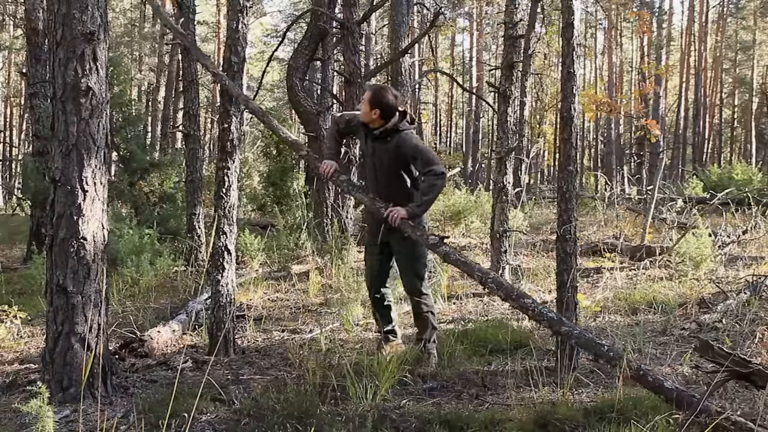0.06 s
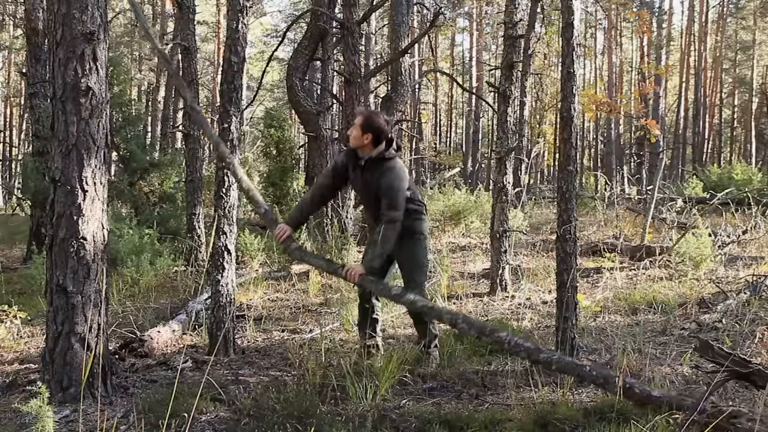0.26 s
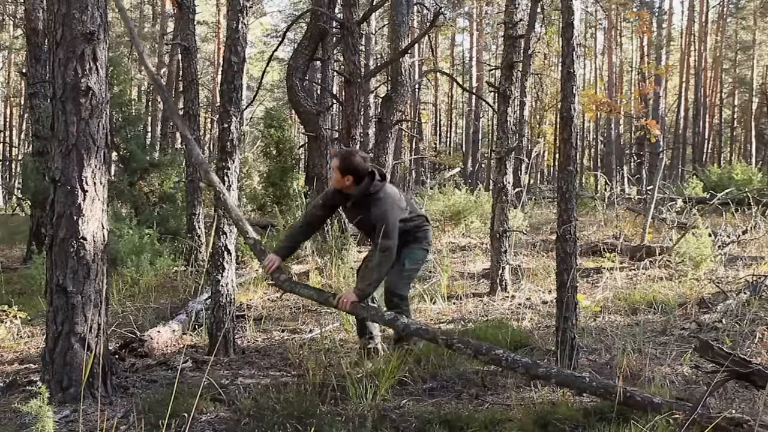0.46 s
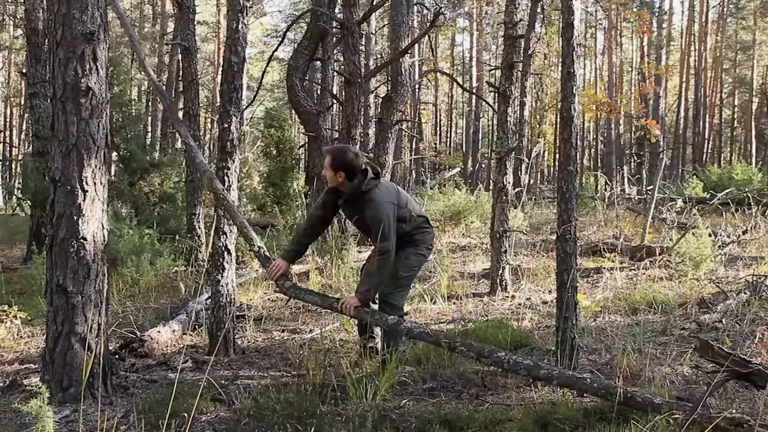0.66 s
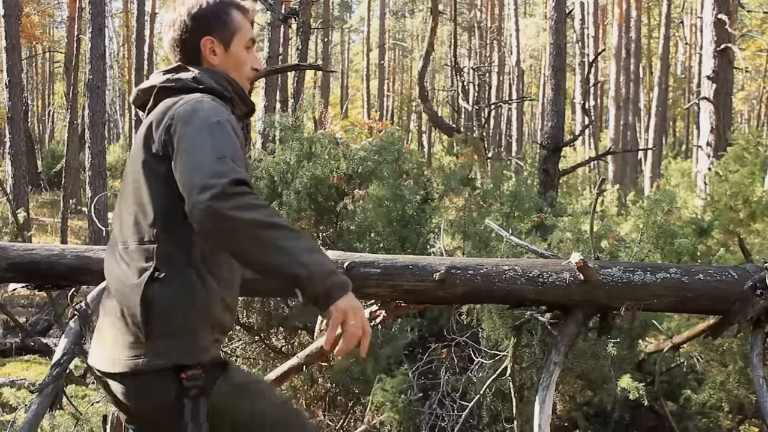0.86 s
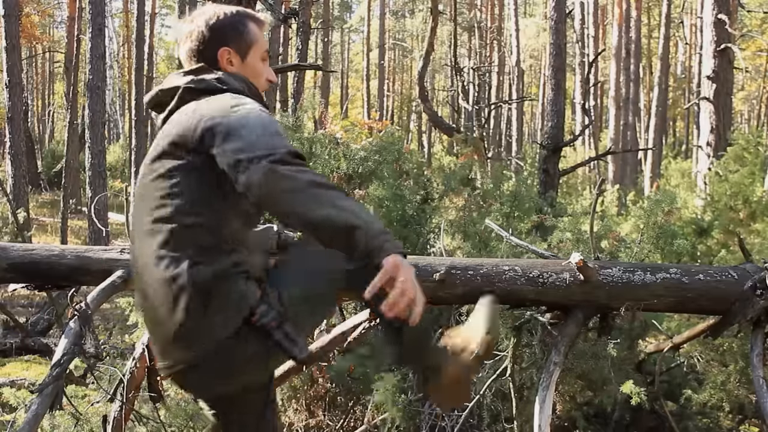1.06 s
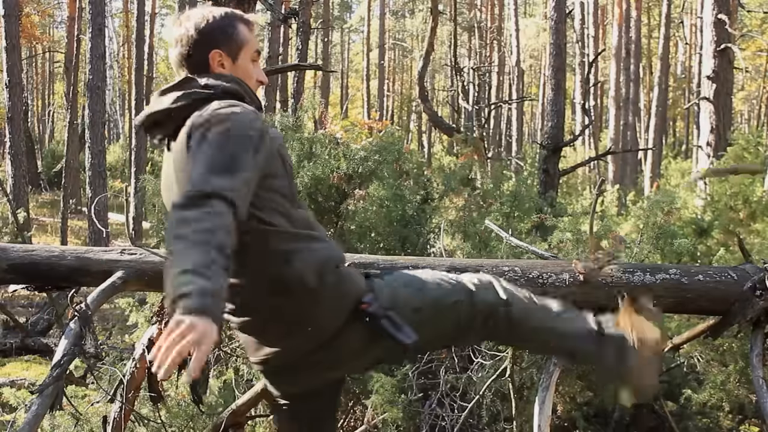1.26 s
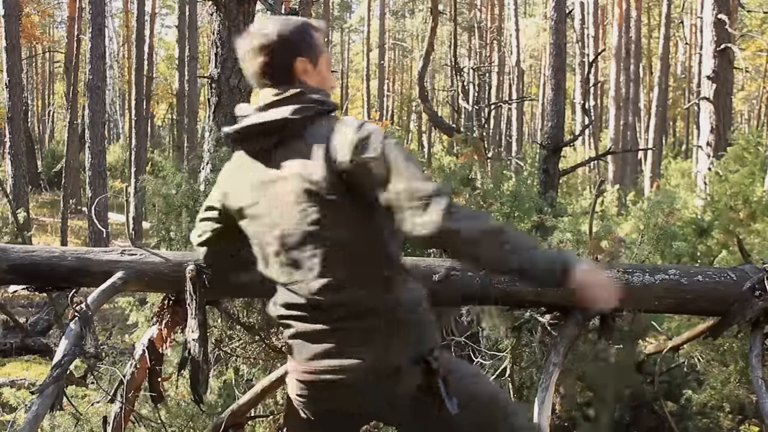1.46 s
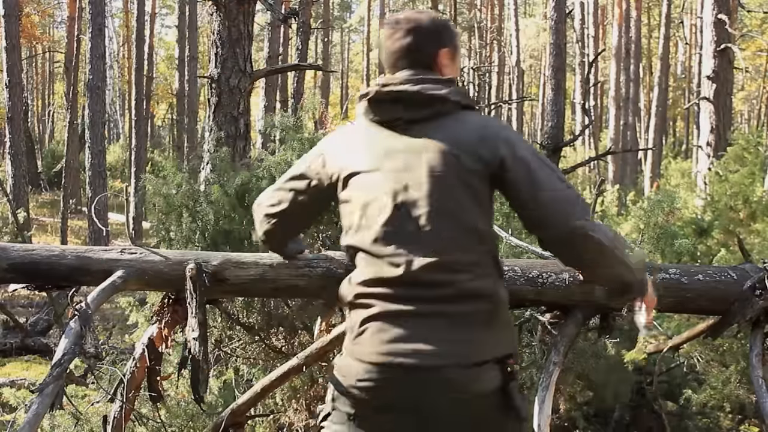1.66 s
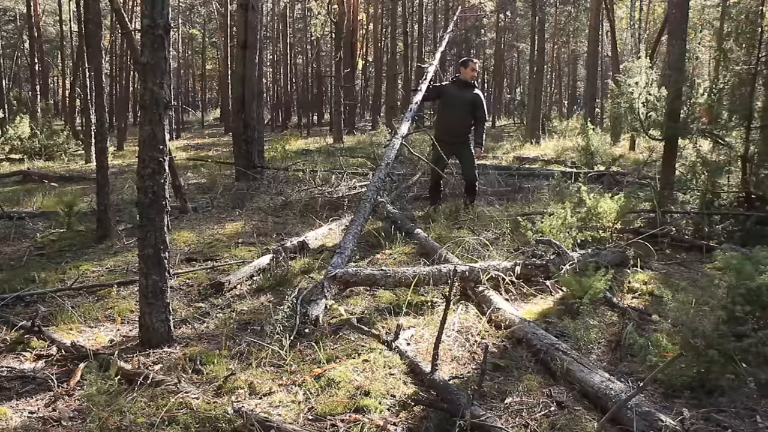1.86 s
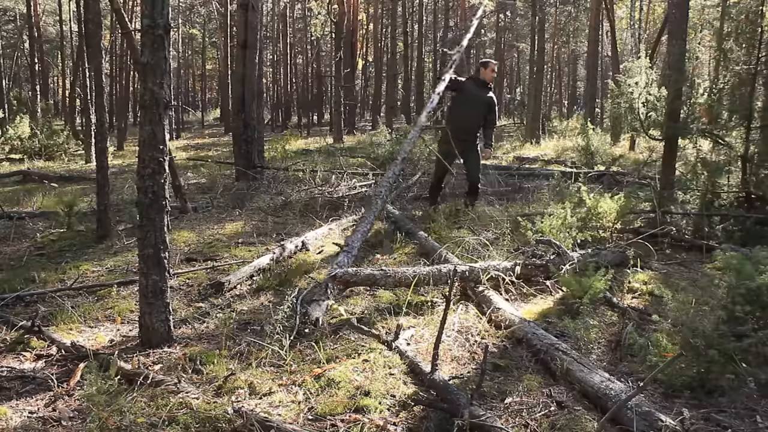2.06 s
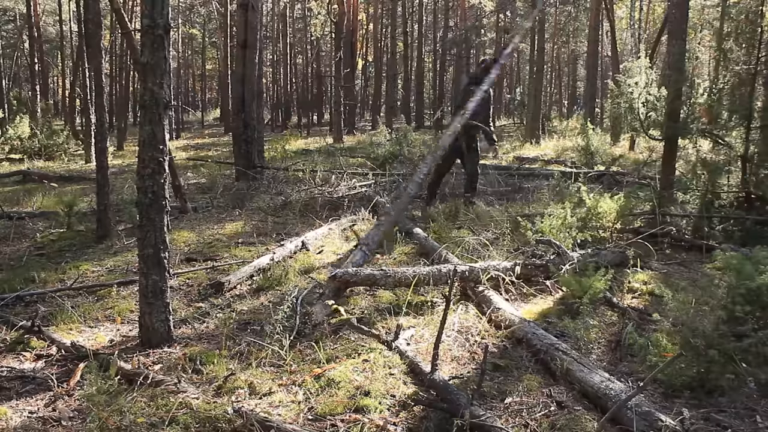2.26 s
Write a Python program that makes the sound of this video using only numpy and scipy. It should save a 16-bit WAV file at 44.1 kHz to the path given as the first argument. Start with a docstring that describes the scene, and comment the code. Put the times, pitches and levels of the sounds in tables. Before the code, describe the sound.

Dead wood cracks: a long pole splinters in a quick run of snaps and drops to the ground. Closer, two kicks snap dry branches, one scrapes through a bush, then a distant knock echoes in the quiet forest.

```python
"""A long dead pole is bent against a trunk in a quiet pine forest: fibres snap one by one, it splits
with falling bending-wave chirps and drops to the ground. Nearer, two kicks crack dry branches off a
fallen tree and a loose branch scrapes through a bush; then a far pole knocks on a log. Breaks are
pulses and click bursts that ring the wood's modes. Litter and clothes rustle over tree hiss and a low
rumble; the trunks scatter a long echo."""
import sys
import numpy as np
from scipy import signal
from scipy.fft import rfft, irfft
from scipy.io import wavfile

SR = 44100
rng = np.random.default_rng(int(sys.argv[2]) if len(sys.argv) > 2 else 0)


def log_audio(samples):
    """Write samples as a 16-bit WAV file to the path given in sys.argv[1]."""
    # one column per channel
    frames = np.atleast_2d(samples).T
    # limit to full scale, then quantise
    limited = np.clip(frames, -1, 1)
    pcm = np.round(limited * 32767).astype(np.int16)
    wavfile.write(sys.argv[1], SR, pcm)


N = 101429
T = np.arange(N) / SR

# Spectrum of cracking wood. Each row: frequency in Hz, relative level in dB.
CRACK_SPECTRUM = [(60, -18.5), (160, -12), (300, -6.5), (600, -5), (1200, -2), (2000, -1), (2700, 2.5),
                  (3900, 1), (5000, -6), (8500, -8), (15000, -19)]
# Spectrum of splinters and twigs. Each row: frequency in Hz, relative level in dB.
SPLINTER_SPECTRUM = [(60, -36), (300, -5.5), (1000, 0), (2500, 3.5), (4200, 4), (6500, -1), (9000, -1),
                     (15000, -22.5)]


def pole():
    """The bent pole breaks: snaps, splits and splinters ring its modes."""
    # Each row: start in seconds, level in dB, pitch in Hz.
    snap_rows = [(.2050, -24.5, 3000), (0.2299, -18, 2180), (0.2317, -8.5, 3700), (0.243, -9, 2430),
                 (0.2531, -2.5, 2280), (.2615, -1.5, 3450), (0.2665, -18, 1500), (0.2719, -10, 1570),
                 (0.2823, -6, 2650), (0.2864, -7.5, 1930), (0.2917, -27, 1980), (0.3005, -3.5, 2200),
                 (0.326, -10.5, 2600), (.3440, -17, 1920), (0.3755, -22, 1500), (.4488, -24, 2710)]
    # Each row: start in seconds, level in dB, first pitch in Hz, travel, rise and decay in seconds.
    split_rows = [(.2604, -1, 2508, .017, 0.00072, 0.0038), (0.3055, 1, 2549, .0175, 0.0015, 0.0042),
                  (.3385, -13, 1498, 0.0178, 0.0016, 0.003)]
    # Each row: start in seconds, level in dB, rise and decay in seconds.
    splinter_rows = [(0.2314, -17.5, 0.00024, 0.0018), (0.2604, -22, 0.00088, 0.0027),
                     (0.2869, -30, .001, .007), (0.3079, -6.5, 0.0011, 0.0013),
                     (.3260, -15, 0.00035, 0.0015), (.3315, -39, .0005, .003), (0.3433, -25, .001, 0.0055),
                     (0.356, -24, 0.00039, 0.0038), (0.365, -23.5, 0.00096, 0.0087),
                     (0.3722, -39.5, 0.00046, 0.015), (.4484, -24.5, 0.00056, 0.0013)]
    # Each row: mode frequency in Hz, gain in dB, t60 in seconds.
    pole_modes = [(498, -0.5, .09), (675, -3, 0.037), (872, 2, 0.063), (966, -2.5, 0.05), (1334, -4, 0.099),
                  (1432, -0.5, 0.12), (1660, -22, 0.076), (1817, -0.5, 0.039), (2330, -21, 0.078),
                  (2650, -13, 0.063)]
    snaps = placed((start_s, snap(db, hz)) for start_s, db, hz in snap_rows)
    splits = placed((start_s, split(*row)) for start_s, *row in split_rows)
    splinters = placed((start_s, crackle(*row)) for start_s, *row in splinter_rows)
    return ringing(snaps + splits + coloured(splinters, SPLINTER_SPECTRUM), pole_modes)


def snap(db, hz):
    """One fibre lets go: about two cycles of a wide wood resonance, then grit."""
    q, low_hz, high_hz = 2.46, 990, 4100
    pulse = resonance(signal.unit_impulse(SR // 10), hz, hz / q)
    pulse = butter(butter(pulse, low_hz, "high"), high_hz, "low", order=4)
    grit = crackle(db=-16.5, rise_s=0.0005, decay_s=0.0016)[:len(pulse)]
    return from_db(db) * (pulse / np.abs(pulse).max() + coloured(grit, CRACK_SPECTRUM))


def split(db, first_hz, travel_s, rise_s, decay_s):
    """Bending waves from a ragged tear: speed goes with the root of frequency, so the pitch falls."""
    fade_s, roughness, rough_hz = 0.018, 0.55, 500
    t = T[:SR // 10]
    wave_time_s = t / (1 + t / travel_s)  # loss goes per cycle, so low waves last longest
    phase = 2 * np.pi * first_hz * wave_time_s
    envelope = swell(wave_time_s, rise_s, decay_s) * np.exp(-t / fade_s)
    noise = butter(rng.standard_normal((2, 2 * len(t))), rough_hz, "low")
    rough_sin, rough_cos = roughness * rms_one(noise[:, len(t):])
    chirp = envelope * ((1 + rough_sin) * np.sin(phase) + rough_cos * np.cos(phase))
    return from_db(db) * chirp * np.linalg.norm(envelope) / np.linalg.norm(chirp) / np.sqrt(2)


def branches():
    """Kicked branches: each crack is an avalanche of breaking fibres that rings the wood."""
    # Each row: start in seconds, level in dB, rise and decay in seconds, tilt in dB per octave.
    crack_rows = [(1.2530, -29.5, 0.0022, 0.014, -3.5), (1.2599, -20, 0.00088, 0.0051, 0.5),
                  (1.2632, -13, 0.00054, 0.0039, -2.24), (1.2729, -30.5, 0.0015, 0.0048, -2),
                  (1.594, -31, 0.0068, .004, -2), (1.602, -18, 0.00019, 0.005, 3.8),
                  (1.6104, -26, 0.0012, 0.017, 0), (1.6229, -10.5, 0.00024, .0013, 1.4),
                  (1.625, -10.5, 0.00039, 0.0035, 1.7), (1.6303, -16, 0.00024, 0.00053, 1.5),
                  (1.6314, -12, .0008, 0.0019, -0.5), (1.637, -24, 0.0019, .005, -5.5),
                  (1.6471, -28, .002, 0.0088, -4.5)]
    # Each row: mode frequency in Hz, gain in dB, t60 in seconds.
    branch_modes = [(233, -1, .09), (527, -11, 0.19), (1295, -6, 0.047), (2014, 1, 0.034),
                    (2000, -7, 0.017), (2450, 1.5, 0.024), (2500, -18, 0.046), (2800, -20, .035),
                    (3460, -9, 0.029)]
    cracks = bursts(crack_rows, CRACK_SPECTRUM, clicks_per_s=14000, spread_db=3.5)
    return ringing(butter(cracks, hz=164, kind="high"), branch_modes)


def thuds():
    """Near impacts of the boot and the falling branch."""
    # Each row: start in seconds, level in dB, pitch in Hz, t60 in seconds.
    thud_rows = [(1.2530, -24, 320, 0.049), (1.2555, -18.5, 615, 0.023), (1.2625, -22, 257, 0.027),
                 (1.2637, -10, 1116, 0.013), (1.6010, -23, 303, 0.038), (1.6250, -24, 243, .06),
                 (1.6440, -25, 328, 0.021), (1.6520, -27, 1030, .025), (1.6680, -24, 286, 0.018)]
    return placed((start_s, knock(*row)) for start_s, *row in thud_rows)


def scrape():
    """The loose branch slides down a bush: dense slips of bark on twigs drive its resonances."""
    # Each row: start in seconds, level in dB, rise and decay in seconds.
    slip_rows = [(1.7250, -36, 0.014, 0.044), (1.7650, -42, 0.039, 0.017), (1.8480, -46, 0.021, 0.015)]
    # Each row: resonance frequency in Hz, width in Hz, gain in dB.
    resonances = [(790, 64, 13.5), (1080, 170, 1), (1800, 360, 4.5), (2450, 520, 3.5), (3530, 520, -9)]
    slips = placed((start_s, crackle(*row)) for start_s, *row in slip_rows)
    return sum(from_db(db) * resonance(slips, hz, width_hz) for hz, width_hz, db in resonances)


def far_knocks():
    """Far poles strike wood and ground."""
    # Each row: start in seconds, level in dB, pitch in Hz, t60 in seconds.
    knock_rows = [(.2612, -24, 190, 0.045), (.3100, -13.5, 230, 0.027), (.3115, -24, 520, .03),
                  (.3300, -33, 160, 0.021), (.3410, -8, 763, 0.019), (.4590, -26, 990, 0.026),
                  (.6090, -29, 880, .03), (.6150, -16.5, 876, 0.017), (.6720, -34, 860, 0.025),
                  (2.2715, -18, 775, 0.011), (2.2760, -31.5, 484, 0.06), (2.2840, -29.5, 874, 0.066)]
    return placed((start_s, knock(*row)) for start_s, *row in knock_rows)


def knock(db, hz, t60_s):
    """A soft contact rings a few short modes from hz up; little radiates below."""
    # Each row: mode frequency as a ratio of the pitch, gain in dB, share of the t60.
    knock_modes = [(1, -2.5, 1), (1.22, -4.5, 0.58), (1.63, -9, 1), (2.3, -21, 0.97)]
    t = T[:SR // 5]
    ring = 0
    for k, (ratio, mode_db, share) in enumerate(knock_modes):
        envelope = from_db(db + mode_db) * np.exp(-np.log(1000) * t / (t60_s * share))
        ring += (-1) ** k * envelope * np.sin(2 * np.pi * hz * ratio * t)
    return butter(butter(ring, hz / 2, "high"), hz=1940, kind="low")


def trunk_echo(x):
    """Quick scatter from the nearest trunks, then a tail that dies band by band."""
    # Each row: frequency in Hz, relative level in dB.
    echo_spectrum = [(100, -0.5), (300, 4.5), (700, 0.5), (1400, -4), (2500, -10), (5000, -0.5),
                     (14000, -11)]
    # Each row: frequency in Hz, t60 in seconds.
    echo_t60 = [(100, 0.59), (1000, 1.0), (3000, 1), (12000, 0.72)]
    rise_s, scatter_db, scatter_s = 0.011, 16, 0.013
    t = T[:3 * SR // 2]
    edges_hz = np.geomspace(50, 18000, 10)
    tail = 0
    for low_hz, high_hz in zip(edges_hz, edges_hz[1:]):
        hz = np.sqrt(low_hz * high_hz)
        band = butter(rng.standard_normal(len(t)), [low_hz, high_hz], "band")
        decay = np.exp(-np.log(1000) * t / at_hz(echo_t60, hz))
        tail += band * from_db(at_hz(echo_spectrum, hz)) * decay
    onset = (1 - np.exp(-t / rise_s)) * (1 + from_db(scatter_db) * np.exp(-t / scatter_s))
    return signal.fftconvolve(x, tail * onset / np.sqrt(SR / 10))[:N]


def litter():
    """Litter, needles and clothes rustle in swells of fine crackle; single twigs tick."""
    # Each row: start in seconds, level in dB, rise and decay in seconds, tilt in dB per octave.
    rustle_rows = [(.35, -46, .02, 0.12, -2.5), (.58, -42, 0.052, 0.09, 3), (.72, -48.5, 0.045, 0.055, 0.5),
                   (.97, -49, .11, 0.27, 0.5), (1.282, -52.5, 0.035, 0.21, -3.5),
                   (1.51, -43.5, 0.042, 0.096, 0), (1.68, -48.5, 0.072, 0.096, -0.5),
                   (1.79, -45.5, 0.079, 0.048, 1), (2.05, -46, .06, 0.086, 4)]
    # Each row: frequency in Hz, relative level in dB.
    rustle_spectrum = [(100, -21.5), (400, 3.5), (800, 7.5), (1500, 2.5), (3500, 3), (5500, -5.5),
                       (9000, -5), (15000, -20)]
    # Each row: start in seconds, level in dB.
    twig_rows = [(.0080, -37), (.0360, -45), (.0440, -39.5), (0.152, -41), (.1737, -49), (0.4754, -34),
                 (0.495, -34), (0.7465, -39), (.7742, -36), (1.058, -45), (1.1800, -39), (1.218, -43),
                 (1.4060, -39.5), (1.5816, -40), (1.6986, -33), (1.8303, -34), (1.986, -41), (2.1073, -36),
                 (2.2876, -34)]
    rustle = bursts(rustle_rows, rustle_spectrum, clicks_per_s=12000, spread_db=7.5)
    ticks = placed((start_s, crackle(db, rise_s=0.00027, decay_s=0.0026)) for start_s, db in twig_rows)
    return rustle + coloured(ticks, SPLINTER_SPECTRUM)


def air():
    """Far hiss of the trees, a rumble near 80 Hz and a light breeze on the microphone."""
    # Each row: frequency in Hz, relative level in dB.
    hiss_spectrum = [(20, 7.5), (45, -15.5), (75, -5), (140, -2.5), (400, 0.5), (900, -3.5), (2000, -8.5),
                     (4000, -9), (9000, -15), (15000, -18)]
    # Level curves. Each row: time in seconds, level in dB.
    hiss_levels = [(0, -53.5), (.2, -50.5), (.8, -48), (1.45, -51), (2.0, -50), (2.3, -49)]
    rumble_levels = [(0, -70), (.27, -73), (.33, -50), (.43, -47.5), (.56, -63.5), (.8, -58.5),
                     (1.15, -66.5), (1.48, -57), (1.63, -72), (1.70, -47), (1.83, -60), (2.3, -62)]
    breeze_levels = [(0, -89), (1.3, -83), (1.5, -58), (1.85, -65), (2.0, -45.5), (2.3, -66)]
    noise = rng.standard_normal((3, N + SR))
    hiss = gain_curve(hiss_levels) * coloured(noise[0], hiss_spectrum)[SR:]
    rumble = gain_curve(rumble_levels) * rms_one(butter(noise[1], hz=[58.7, 102], kind="band")[SR:])
    breeze = gain_curve(breeze_levels) * rms_one(butter(noise[2], hz=43.8, kind="low")[SR:])
    return hiss + rumble + breeze


def crackle(db, rise_s, decay_s, clicks_per_s=6200, spread_db=4):
    """Burst of tiny uneven clicks; db is its rms at the crest."""
    chance, draw = rng.random((2, N // 2))
    sizes = from_db(spread_db * np.minimum(-np.log(draw + 1e-9), 4))
    clicks = np.sign(rng.standard_normal(N // 2)) * (chance < clicks_per_s / SR) * sizes
    envelope = swell(T[:N // 2], rise_s, decay_s)
    burst = clicks * envelope
    return from_db(db) * burst * np.linalg.norm(envelope) / (np.linalg.norm(burst) + 1e-12)


def bursts(rows, spectrum, clicks_per_s, spread_db):
    """One crackle per row, each with its own tilt of the spectrum."""
    return placed(
        (start_s, coloured(crackle(db, rise_s, decay_s, clicks_per_s, spread_db), spectrum, tilt))
        for start_s, db, rise_s, decay_s, tilt in rows)


def ringing(force, modes):
    """A force heard directly and through the wood's modes."""
    return force + sum(from_db(db) * resonance(force, hz, np.log(1000) / np.pi / t60_s)
                       for hz, db, t60_s in modes)


def resonance(x, hz, width_hz):
    """Two-pole resonance, peak gain 1."""
    radius = np.exp(-np.pi * width_hz / SR)
    feedback = [1, -2 * radius * np.cos(2 * np.pi * hz / SR), radius ** 2]
    return signal.lfilter(np.array([1, 0, -1]) * (1 - radius ** 2) / 2, feedback, x + 1e-18)


def coloured(x, spectrum, tilt_db_per_octave=0):
    """Minimum-phase filter of unit power, tilted about 2 kHz."""
    size = 4096
    hz = np.maximum(np.arange(size // 2 + 1) * SR / size, 1)
    gain = from_db(at_hz(spectrum, hz) + tilt_db_per_octave * np.log2(hz / 2000))
    cepstrum = irfft(np.log(gain))
    cepstrum[1:size // 2] *= 2
    cepstrum[size // 2 + 1:] = 0
    response = irfft(np.exp(rfft(cepstrum)))
    return signal.fftconvolve(x, response / np.linalg.norm(response))[:len(x)]


def butter(x, hz, kind, order=2):
    """Butterworth filter."""
    return signal.sosfilt(signal.butter(order, hz, kind, fs=SR, output="sos"), x + 1e-18)


def swell(t, rise_s, decay_s):
    """Smooth rise, exponential decay."""
    rise = np.sin(np.pi / 2 * np.minimum(t / rise_s, 1)) ** 2
    return rise * np.exp(-np.maximum(t - rise_s, 0) / decay_s)


def placed(events):
    """Sum (start_s, sound) pairs on the time line."""
    track = np.zeros(N)
    for start_s, sound in events:
        i = int(np.clip(start_s * SR, 0, N - 1))
        track[i:i + len(sound)] += sound[:N - i]
    return track


def at_hz(rows, hz):
    """Interpolate rows over log frequency."""
    row_hz, values = np.transpose(rows)
    return np.interp(np.log(np.maximum(hz, 1)), np.log(row_hz), values)


def gain_curve(rows):
    """Gain over time from rows of seconds and dB."""
    return from_db(np.interp(T, *np.transpose(rows)))


def from_db(db):
    """Decibels to gain."""
    return 10 ** (np.asarray(db) / 20)


def rms_one(x):
    """Scale to rms 1."""
    return x / np.sqrt(np.mean(x ** 2) + 1e-20)


def scene():
    """All sources centred; only a faint hiss differs between the channels."""
    far_break = pole()
    near_break = branches() + thuds() + scrape()
    knocks = far_knocks()
    echo = trunk_echo(from_db(-9.5) * far_break + from_db(-14) * near_break + from_db(-11) * knocks)
    side_hiss = np.array([[1], [-1]]) * from_db(-64) * rng.standard_normal(N)
    return far_break + near_break + knocks + echo + litter() + air() + side_hiss


def record(dry):
    """Microphone: dip near 5 kHz, soft overload on the loudest peaks, steep top cut."""
    dip_hz, dip_q, dip_depth = 4993, 3.95, 0.44
    ceiling, cutoff_hz = 0.47, 16000
    dipped = dry - dip_depth * resonance(dry, dip_hz, dip_hz / dip_q)
    limited = dipped / (1 + (dipped / ceiling) ** 8) ** (1 / 8)
    return signal.sosfilt(signal.ellip(10, 0.2, 80, cutoff_hz, fs=SR, output="sos"), limited)


dry = scene()
out = record(dry)
log_audio(out)
```